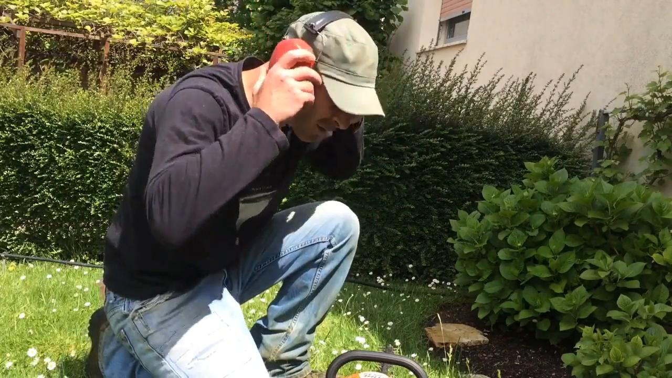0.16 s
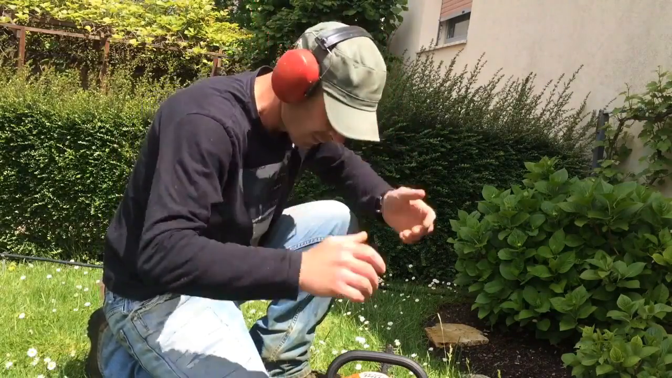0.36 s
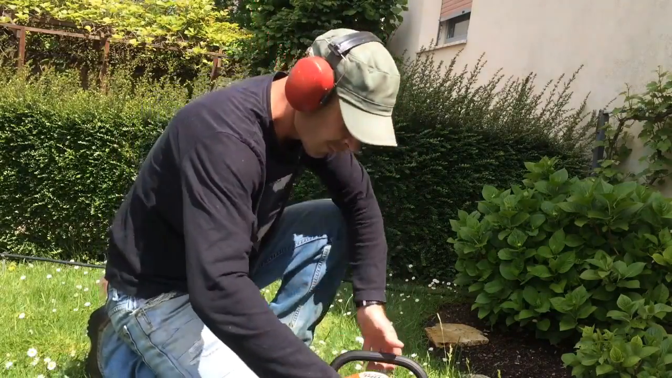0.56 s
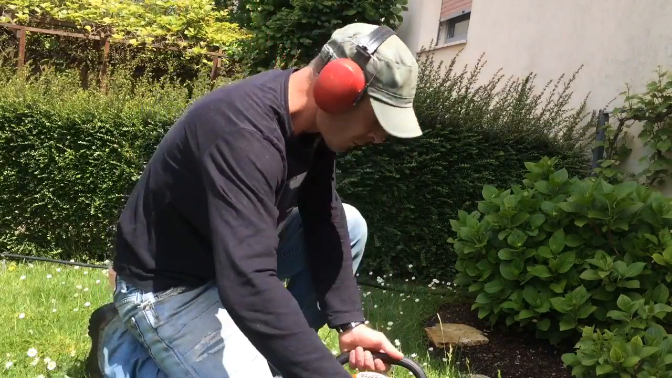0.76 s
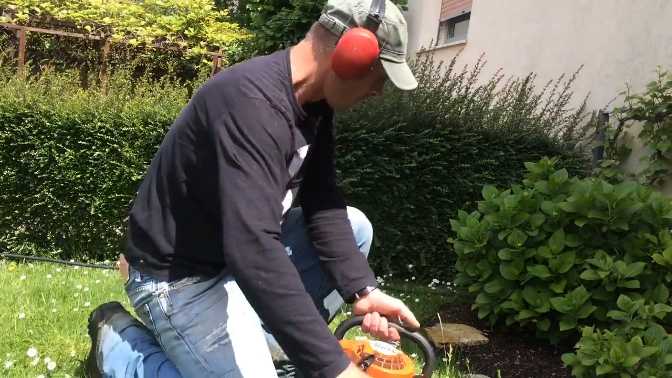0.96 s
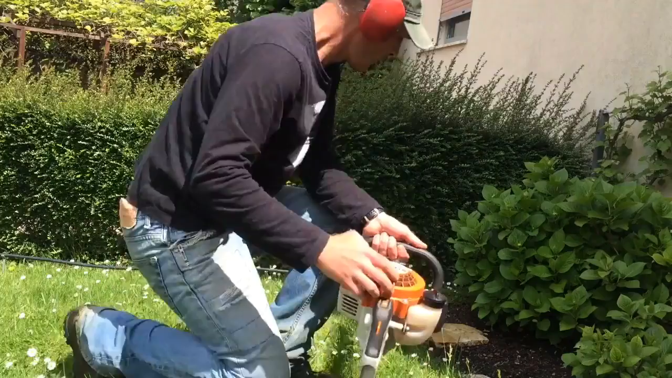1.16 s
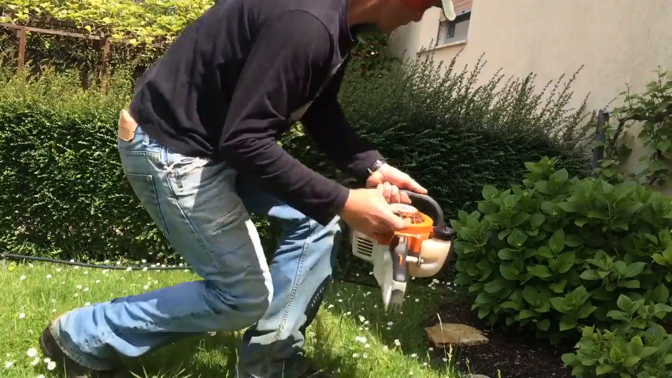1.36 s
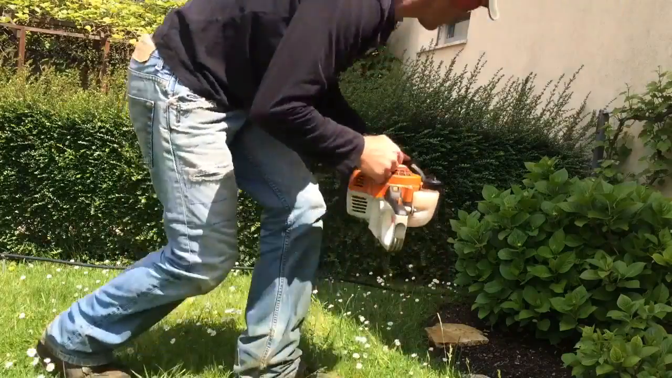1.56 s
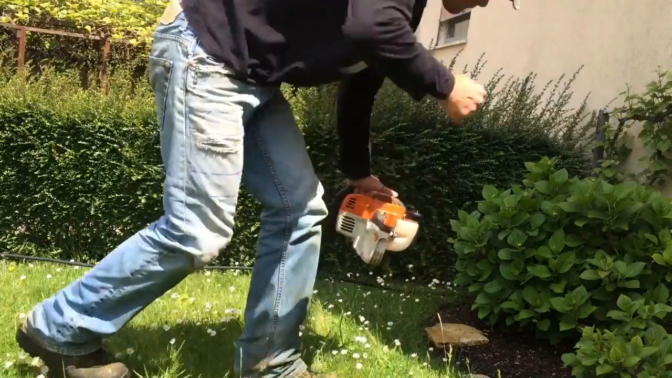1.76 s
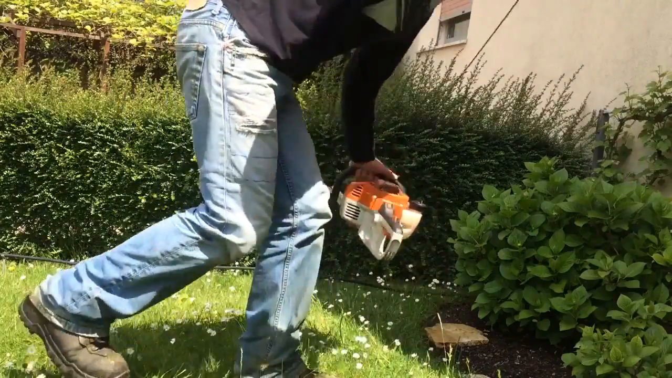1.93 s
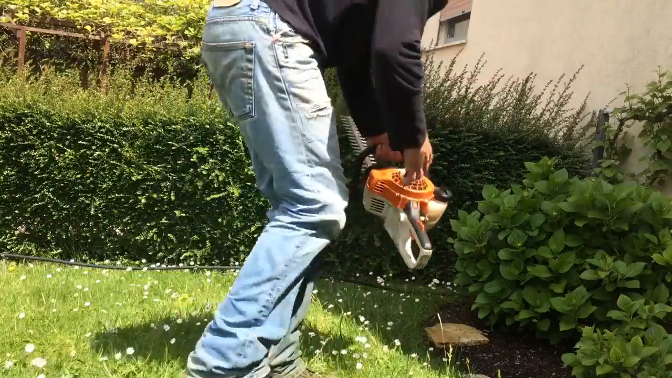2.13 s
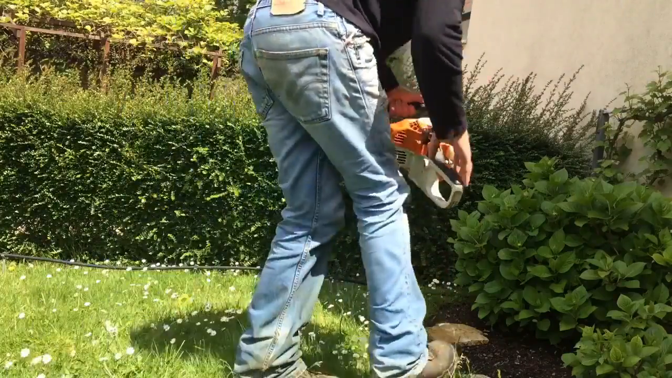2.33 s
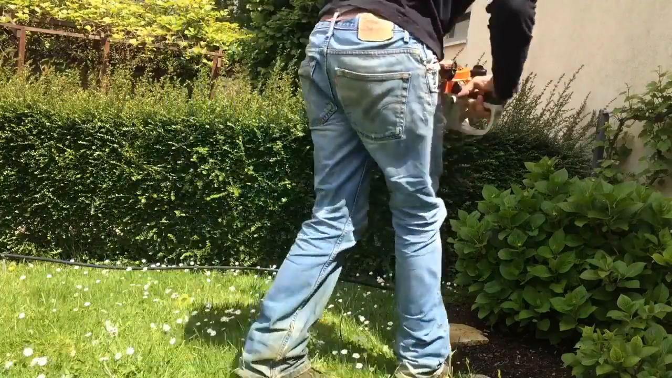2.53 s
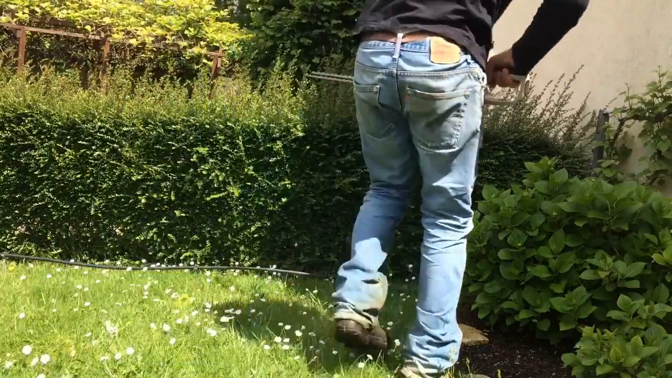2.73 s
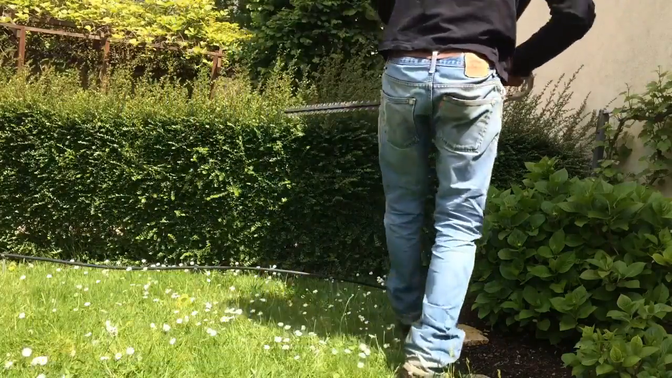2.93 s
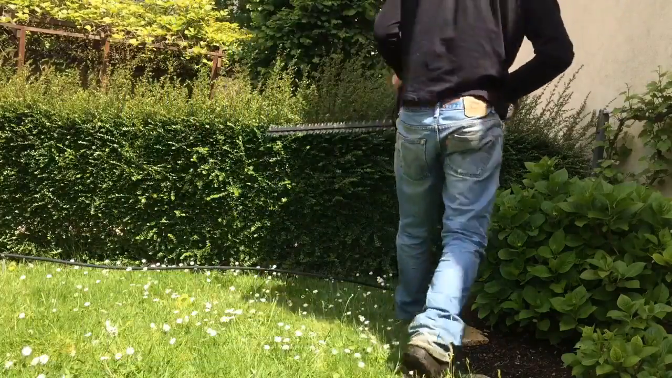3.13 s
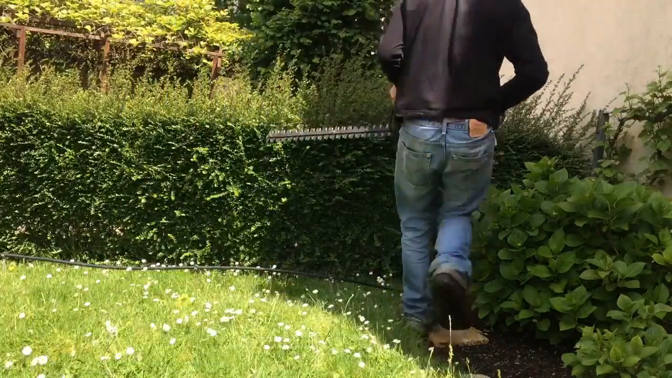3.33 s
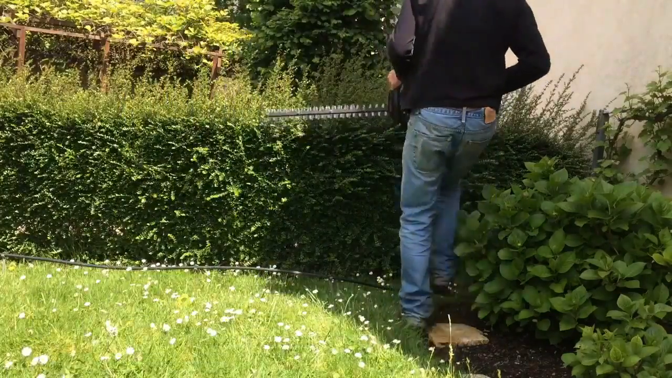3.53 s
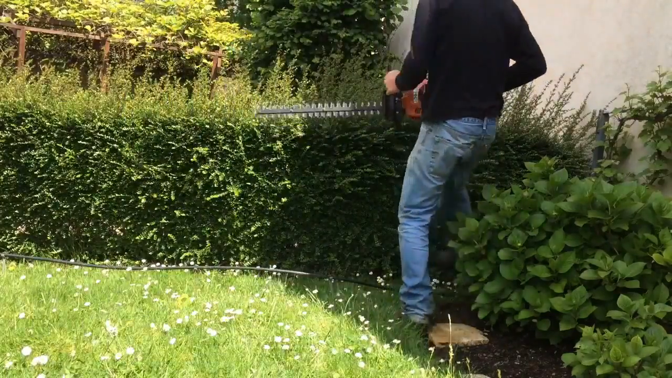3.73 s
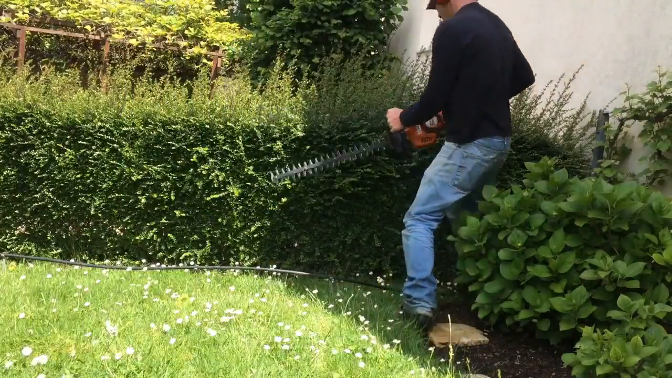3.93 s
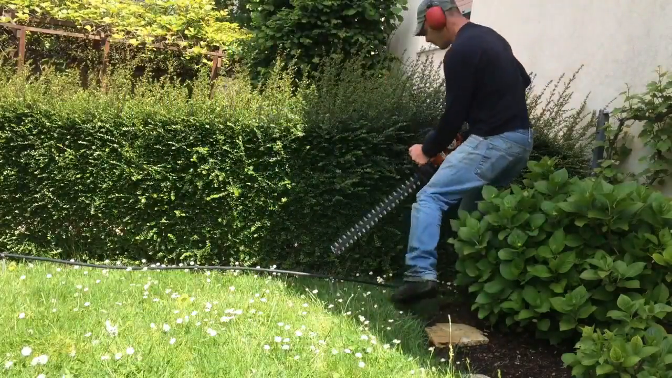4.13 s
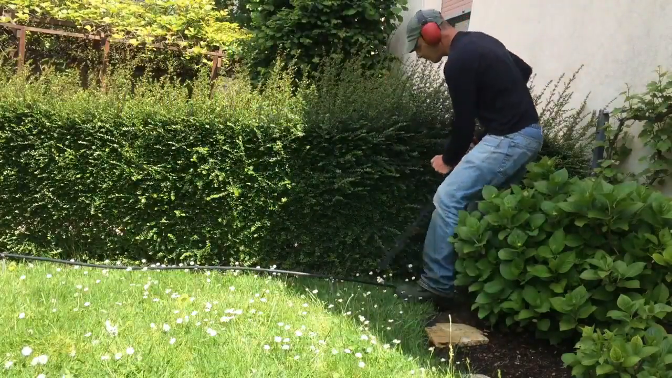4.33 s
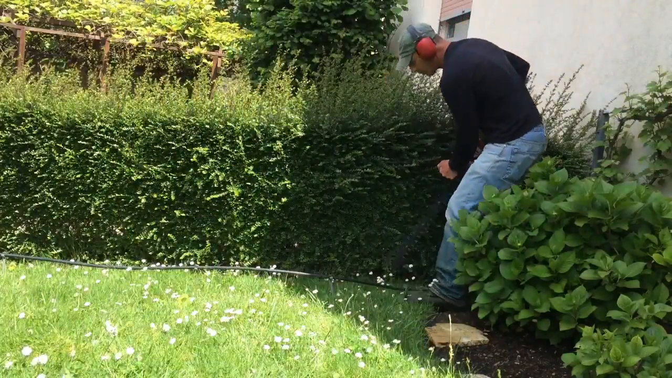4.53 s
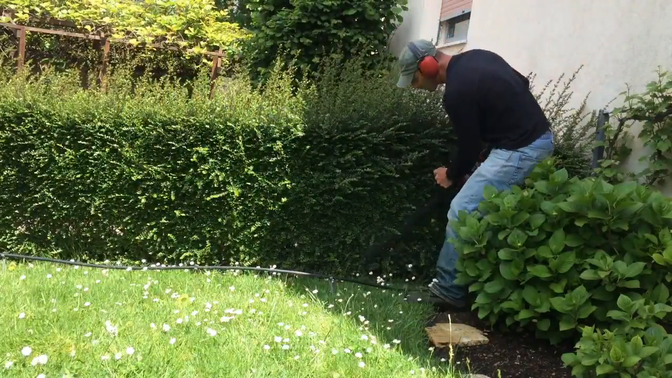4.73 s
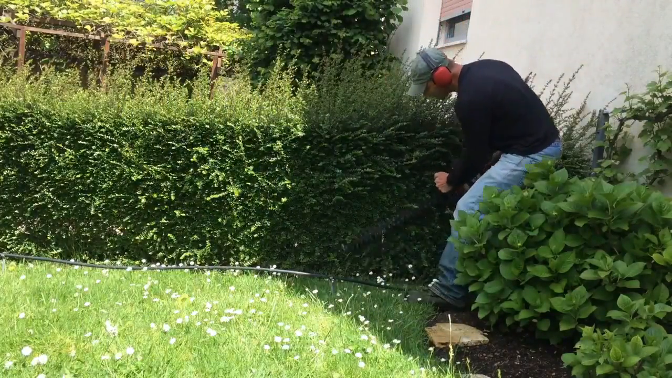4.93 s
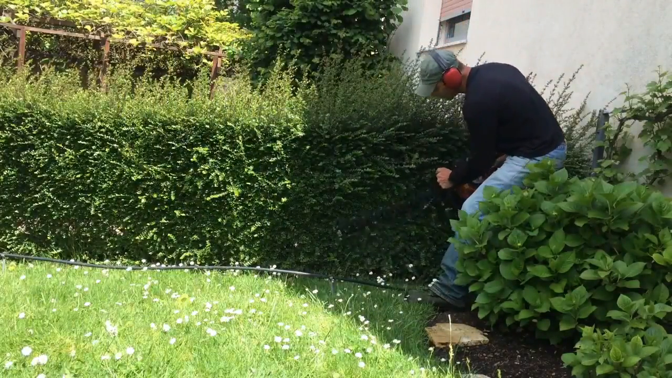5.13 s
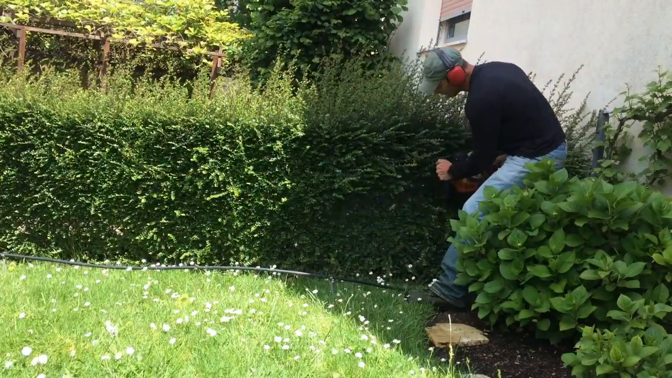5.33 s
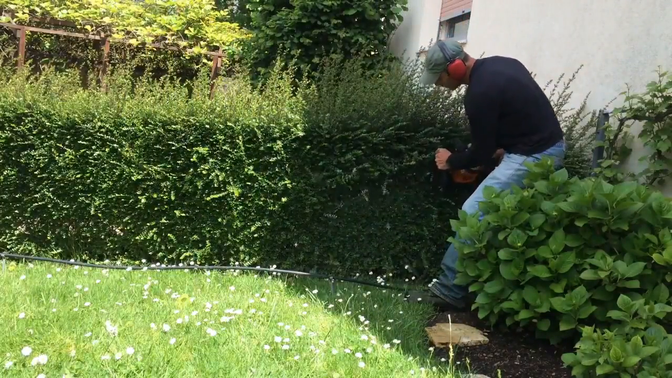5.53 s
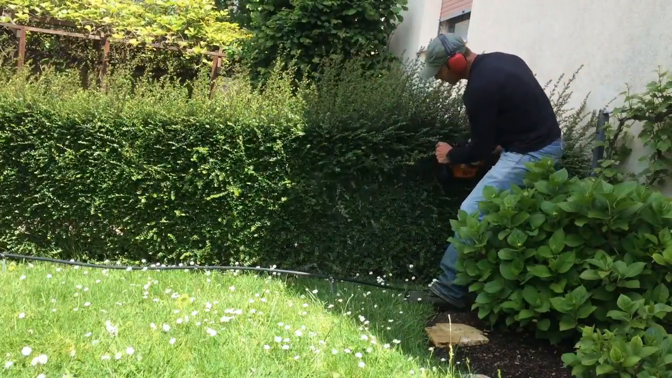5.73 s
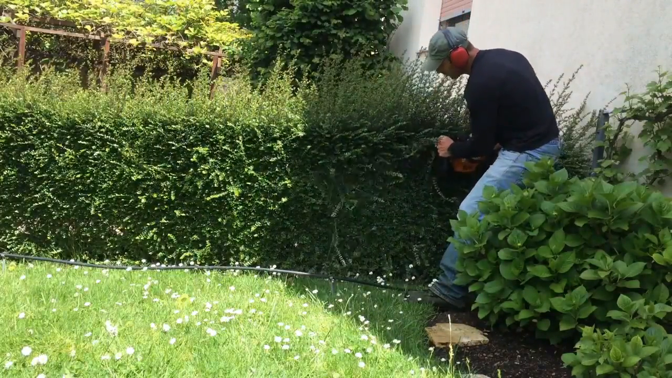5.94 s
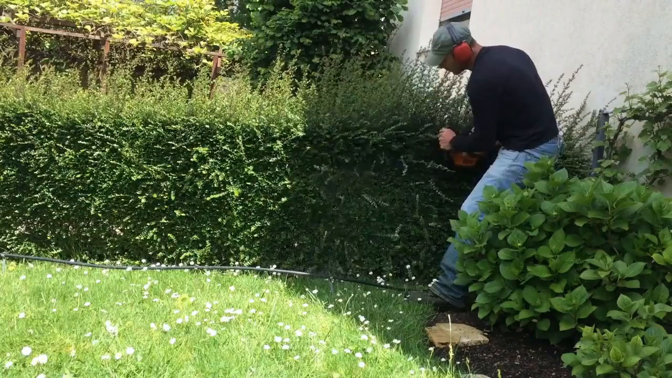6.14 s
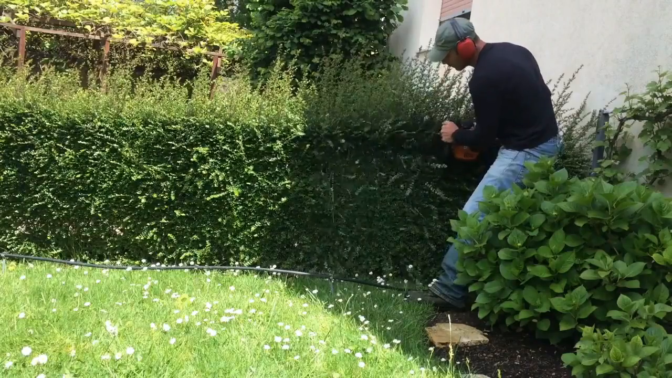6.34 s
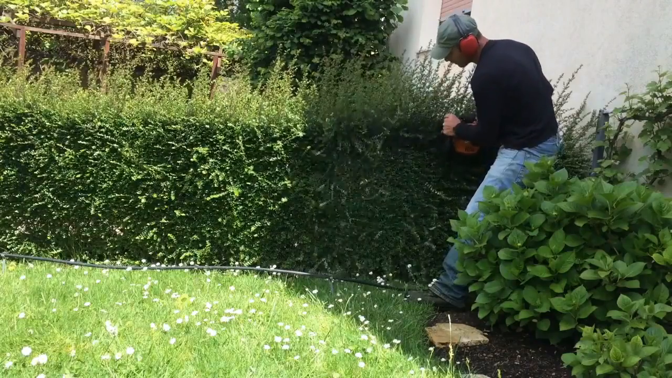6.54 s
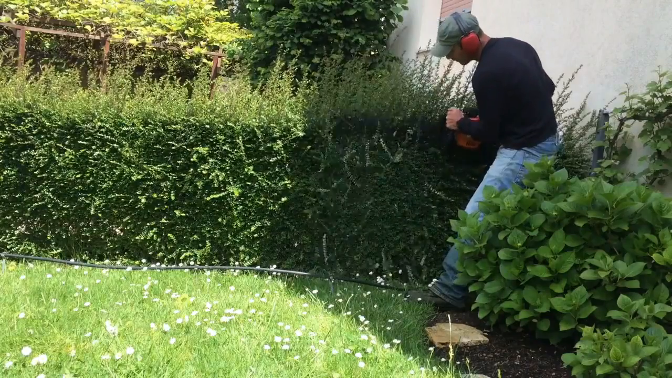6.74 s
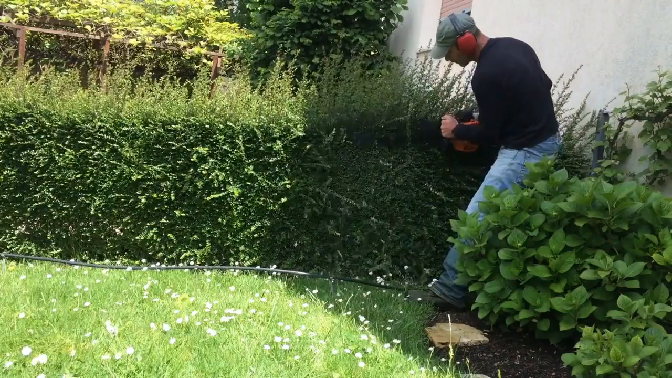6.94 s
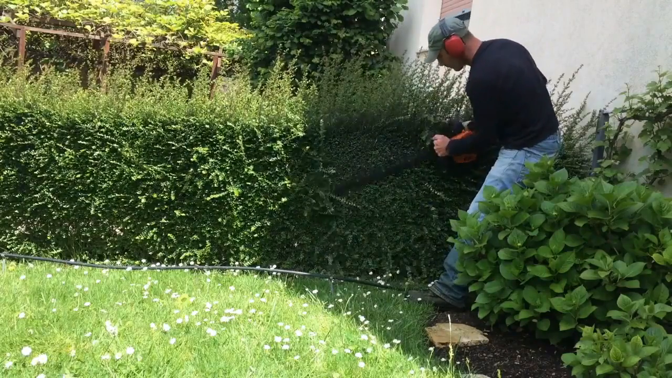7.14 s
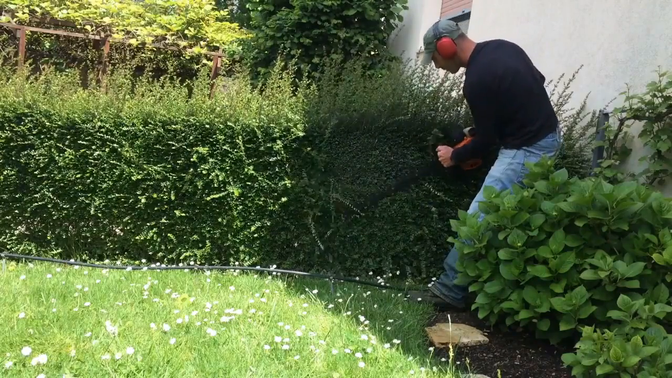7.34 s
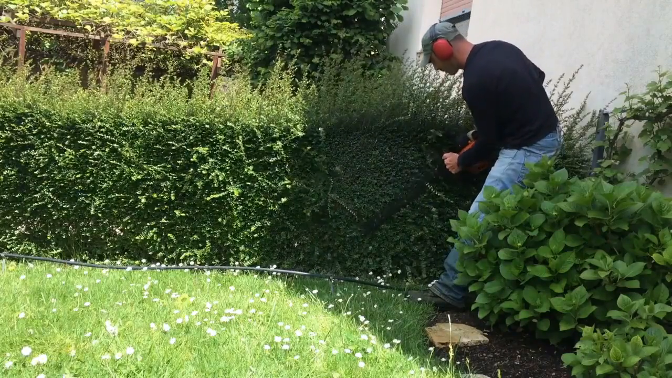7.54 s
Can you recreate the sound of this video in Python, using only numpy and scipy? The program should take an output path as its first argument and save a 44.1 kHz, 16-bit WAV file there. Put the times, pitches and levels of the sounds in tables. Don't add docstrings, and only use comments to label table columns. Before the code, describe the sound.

A dry outdoor garden, heard from one fixed microphone, almost mono. From 0 to 1.7 s it is quiet: low lumpy wind puffs, faint cloth rustle, small plastic clicks, a sharper knock at 0.9 and a stronger one at 1.3. At about 1.8-2.4 s hard, hollow plastic knocks cluster with short ratchety starter-cord rasps, the loudest clack near 2.35, while a small two-stroke engine coughs and catches from 1.9. Until 4.5 s it idles unevenly, roughly twelve dull pops a second, with puffing exhaust, rattling casing and metallic pings; the pops grow duller as it is carried away. From 4.5 s it revs up sharply, reaching top speed by about 5.1. A loud, nasal exhaust drone holds, fluttering rapidly with limiter thumps over bright fan and blade hiss and slight twig crackle. Around 7.1 s pitch and level sag briefly, then recover, running on to the abrupt end at 7.6.

```python
import sys
import numpy as np
from scipy import signal
from scipy.io import wavfile
from scipy.ndimage import uniform_filter1d

SR = 44100
rng = np.random.default_rng(int(sys.argv[2]) if len(sys.argv) > 2 else 0)


def store_wav(level_fs):
    pcm = np.round(np.clip(np.atleast_2d(level_fs), -1, 1) * 32767)
    wavfile.write(sys.argv[1], SR, pcm.T.astype(np.int16))


def convert_level_to_amplitude(level_db):
    exponent = np.asarray(level_db, float) / 20
    return 10 ** exponent


N = 334719
TIME = np.arange(N) / SR


def evened(x):
    return x / np.sqrt(np.mean(x ** 2) + 1e-20)


def read(points, hz):
    f, value = np.transpose(points)
    return np.interp(np.log(hz + 1), np.log(f + 1), value)


def columns(rows):
    s, *rest = np.transpose(rows)
    return [np.interp(TIME, s, c) for c in rest]


def drift(hz):
    return evened(signal.lfilter(*signal.butter(1, hz, fs=SR), rng.standard_normal(N)))


def spikes(s, db):
    out = np.zeros(N)
    out[np.round(np.asarray(s) * SR).astype(int)] = convert_level_to_amplitude(db)
    return out


def ringing(modes, rise_s):
    t = TIME[:4000]
    rings = sum(convert_level_to_amplitude(db) * np.exp(-np.pi * w * t) * np.sin(2 * np.pi * f * t) for f, w, db in modes)
    return (1 - np.exp(-t / rise_s)) * rings


def causal(points):
    hz = abs(np.fft.fftfreq(8192, 1 / SR))
    gain = np.log(convert_level_to_amplitude(np.maximum(read(points, hz), -100)))
    pulse = np.fft.ifft(np.exp(gain - 1j * signal.hilbert(gain).imag)).real[:2048]
    return pulse / abs(pulse).max()


def noise(points, rings=(), sweep=((0, 0),), ring_db=0, patchy_db=1.5):
    frames, hz = N // 256 + 5, np.fft.rfftfreq(1024, 1 / SR)[:, None]
    t = np.arange(frames) * 256 / SR
    a, b, patches = rng.standard_normal((frames, 513, 3)).T
    patches = uniform_filter1d(patches, size=8, axis=0)
    patches = evened(uniform_filter1d(patches, size=10, axis=1))
    slide = np.interp(t, *np.transpose(sweep))
    swung = np.interp(t, *np.transpose(LOAD)[::2])
    flicker = uniform_filter1d(rng.standard_normal((frames, 8)), size=9, axis=0)
    flicker_db = 2.2 * evened(flicker).T
    lift = 1
    for (f, w, db, *change), wobble_db in zip(rings, flicker_db):
        peak_db = ring_db + 0.61 * (db + sum(change) * swung) + wobble_db
        lift = lift + convert_level_to_amplitude(peak_db) / (1 + (2 * (hz - f - slide) / w) ** 2)
    z = (a + 1j * b) * convert_level_to_amplitude(patchy_db * patches + read(points, hz)) * lift
    return evened(signal.istft(z, nperseg=1024, noverlap=768)[1][:N])


# f/Hz, level/dB per Hz
WIND = [(12, -57), (20, -27), (38, -7.5), (92, 0.5), (269, -20), (420, -22), (500, -25), (650, -56),
        (1100, -120)]
# t/s, level/dB
GUSTS = [
    (.17, 8.5),
    (.45, 6),
    (.7, 8.5),
    (.914, 8),
    (1.2, 6),
    (1.47, 4.5),
    (1.7, 5),
]
# f/Hz, level/dB per Hz
RUSTLE = [(150, -5.5), (250, -12.5), (1700, -15.5), (2060, -17), (3010, -20.5), (14700, -27), (15500, -33)]
# t/s, level/dB
MOVING = [(0, -69.5), (.28, -73), (.334, -66.5), (.45, -70.5), (.63, -71.5), (.84, -65), (.92, -66),
          (1.05, -63), (1.17, -65), (1.29, -58), (1.49, -66), (1.72, -68.5)]


def air():
    gust_s = 0.08
    wind_db = -66 + sum(db * np.exp(-((TIME - s) / gust_s) ** 2 / 2) for s, db in GUSTS)
    wind = convert_level_to_amplitude(wind_db) * noise(WIND, patchy_db=0.3)
    return wind + convert_level_to_amplitude(columns(MOVING)[0]) * noise(RUSTLE, patchy_db=1.6)


# t/s, peak level/dB, ring f/Hz, treble level/dB
CLICKS = [(0.13, -49, 3140, 1), (0.3, -50, 2050, -14), (0.369, -59, 2000, -7), (0.691, -39, 2160, -56),
          (0.805, -31, 2300, -42), (0.825, -36, 2600, -34), (0.905, -19.5, 2670, 2),
          (1.001, -48, 1300, -30), (1.093, -45, 2500, -23), (1.041, -36, 2800, -24),
          (1.328, -13, 1390, -11), (1.338, -28, 1430, -35), (1.411, -37, 1630, -1), (1.452, -51, 1590, -18),
          (1.586, -42, 1000, 5), (1.742, -28.5, 1020, -40), (1.783, -22, 1080, -38),
          (1.803, -22.5, 1070, -25), (1.859, -4, 1480, -22), (1.962, -7, 1015, -14), (2.081, -22, 950, -13),
          (2.128, -13, 1110, -8), (2.157, -13, 1330, -4), (2.247, -31, 1230, -12), (2.347, 0, 2640, -6),
          (2.3495, -2, 1510, -19), (2.356, 0, 4050, -6)]
# f/Hz, level/dB per Hz
KNOCK = [(180, -38), (300, -31), (641, -7), (1350, 0), (2140, -5), (2830, -10.5), (3810, -16), (5210, -15),
         (15500, -41)]
# multiple of f, level/dB
OVERTONES = [(1, -1), (2.1, -5), (2.95, -11)]


def clicks():
    out, t = np.zeros(N + 4000), TIME[:4000]
    for s, db, hz, treble_db in CLICKS:
        t60 = 0.075 * 1000 / hz
        colour = causal([(f * (hz / 1350) ** 0.65, level) for f, level in KNOCK])
        fall = convert_level_to_amplitude(-60 * t / t60) + 2.5 * np.exp(-t / 0.001) + convert_level_to_amplitude(-20 - 60 * t / 0.3)
        crack = signal.oaconvolve(rng.standard_normal(len(t)) * fall, colour)[:len(t)]
        crack = crack + convert_level_to_amplitude(treble_db + 31.5) * np.gradient(crack)
        ring = sum(convert_level_to_amplitude(level - 90 * np.sqrt(k) * t / t60) * np.sin(2 * np.pi * k * hz * t)
                   for k, level in OVERTONES)
        hollow_db = -32 - 0.82 * treble_db * (hz / 2200) ** 2
        hollow = ringing([(640, 230, hollow_db)], rise_s=0.0014)
        knock = crack / abs(crack).max() + 0.48 * ring + hollow
        out[round(s * SR):][:len(t)] += convert_level_to_amplitude(db - 7.5) * knock
    return out[:N]


# t/s, level/dB, decay/s
STARTER = [
    (1.745, -64, 0.068),
    (1.79, -55, 0.026),
    (1.856, -32.5, 0.025),
    (1.966, -28, 0.066),
    (2.246, -46, 0.062),
    (2.344, -31.5, 0.037),
]


def starter():
    rise_s = 0.0038 / 3
    return sum(convert_level_to_amplitude(db) * np.exp(-abs(TIME - t) / np.where(TIME < t, rise_s, dies)) for t, db, dies in STARTER)


# t/s, pop peak level/dB, casing jolt/dB
CATCHING = [(1.908, -17.5, -5), (1.94, -13.5, 0), (1.963, -46, 2.5), (2.021, -26, 5), (2.087, -26, 1),
            (2.134, -35, 4.5), (2.176, -17, 2.5), (2.246, -34, 6), (2.31, -20, 2), (2.353, -41, -6.5),
            (2.401, -16.5, -2.5), (2.444, -43, 0.5), (2.493, -41, 2.5), (2.563, -43, 4.5), (2.636, -46, 4)]
# t/s, pop peak level/dB, casing jolt/dB
IDLING = [(2.724, -15, 6.1), (2.808, -17, 6.1), (2.871, -15, 2.4), (2.956, -18, 5.9), (3.038, -13, 4.1),
          (3.12, -12.5, 2.4), (3.202, -13, 3.2), (3.284, -9.5, 2.2), (3.324, -18, 2.7), (3.365, -14, 4.4),
          (3.443, -9.5, 2.4), (3.505, -12, 7), (3.588, -21, 8.4), (3.67, -15, 6.4), (3.754, -26, 4.4),
          (3.836, -30, 5.5), (3.919, -23, 5), (3.999, -30, 5.6), (4.039, -45, 4.9), (4.12, -23, 3.3),
          (4.192, -29, 4.1), (4.251, -29, 3.4), (4.312, -26, 5.9), (4.38, -40, 7.1), (4.4, -16, 4.3),
          (4.46, -28, 3), (4.483, -22, 6.8)]
ALL_FIRINGS = CATCHING + IDLING
# t/s, shaft speed/turns per s
RUN = [(4.5, 58.5), (4.57, 84.5), (4.66, 113), (4.75, 134.6), (4.79, 145.6), (4.86, 152.3), (5.03, 161.2),
       (5.11, 167.6), (5.36, 168.6), (5.7, 168), (6.95, 169), (7.02, 166.9), (7.13, 149.8), (7.24, 156.5),
       (7.31, 164.2), (7.4, 168.8), (7.59, 170)]


def shaft():
    idle_turns_per_s = 45
    s = np.transpose(ALL_FIRINGS)[0]
    whole = np.r_[0, np.cumsum(np.round(np.diff(s) * idle_turns_per_s))]
    running = columns(RUN)[0] * (1 + .001 * drift(20)) * (TIME > s[-1])
    return np.interp(TIME, s, whole) + np.cumsum(running) / SR


def jolts():
    s, _, jolt_db = np.transpose(ALL_FIRINGS)
    last = np.maximum(np.searchsorted(s, TIME) - 1, 0)
    return uniform_filter1d(jolt_db[last] * np.exp(-abs(TIME - s[last]) / 0.081), size=100)


# t/s, casing level/dB, pipe level/dB
CARRIED = [(1.84, -44, -18), (1.9, -33.5, -22), (1.97, -34, -26), (2.2, -36, -30), (2.4, -32.5, -28.5),
           (2.62, -38.5, -27), (2.8, -35, -26.5), (3.4, -36.5, -27.5), (3.57, -41, -28.5), (3.75, -37, -29),
           (4.06, -37, -37), (4.24, -38.5, -32), (4.36, -44.5, -29), (4.5, -35.5, -35)]


def casing():
    jolt_db, rasp = jolts(), starter()
    caught = convert_level_to_amplitude(columns(CARRIED)[0]) * (TIME > CARRIED[0][0])
    idle_body = caught * convert_level_to_amplitude(jolt_db) + rasp
    idle_fizz = (caught * convert_level_to_amplitude(1.27 * jolt_db) + rasp) * convert_level_to_amplitude(0.2)
    throttle = np.clip((TIME - RUN[0][0] + 0.011) / 0.052, 0, 1)
    load_db, swung = columns(LOAD)
    full_body = convert_level_to_amplitude(-21.5 + 0.17 * load_db)
    full_fizz = convert_level_to_amplitude(-28 + 0.098 * load_db - 2.5 * swung)
    body = (1 - throttle) * idle_body + throttle * full_body
    fizz = (1 - throttle) * idle_fizz + throttle * full_fizz
    return body, fizz


def clanks():
    strikes_per_s = 160
    size = convert_level_to_amplitude(3.5 * np.minimum(rng.exponential(1, N), 3)) * (rng.random(N) < strikes_per_s / SR)
    part = rng.integers(0, 12, N)
    out = np.zeros(N)
    for k, hz in enumerate(np.geomspace(1400, 8600, 12)):
        ring = ringing([(hz, 120 + .07 * hz, 0), (1.7 * hz, 700, -3)], rise_s=0.0006)[:1000]
        out += signal.oaconvolve(size * (part == k), ring)[:N]
    return evened(out)


# f/Hz, level/dB per Hz
ROAR_IDLE = [(180, -3), (300, -4), (663, -2), (953, 1.5), (1140, -0.5), (2480, -0.5), (3450, -4.5),
             (4210, -2), (6360, -6), (7020, -7.5), (7500, -8), (9600, -10), (15500, -14)]
# f/Hz, width/Hz, level/dB
RING_IDLE = [(3175, 43, 12), (4110, 200, 5), (4360, 93, -7), (5220, 36, 16), (6970, 140, 14.5),
             (7900, 390, -11), (9400, 770, -5), (10570, 72, 6)]


def rattle(turns, gate, struck):
    each_turn_db = 2.2 * rng.standard_normal(int(turns[-1]) + 1)
    harder = uniform_filter1d(convert_level_to_amplitude(each_turn_db[turns.astype(int)]), size=60)
    shaken = noise(ROAR_IDLE, RING_IDLE, ring_db=-5.0, patchy_db=2.5)
    return shaken * evened((1.1 + gate) * harder) + 0.28 * struck


def roar(turns, cuts):
    body, fizz = casing()
    throttle = np.clip((TIME - RUN[0][0]) / 0.063, 0, 1)
    gate = np.exp(-((turns + 0.25 * drift(11)) % 1) / 0.39)
    struck = clanks()
    both = np.sqrt(1 - throttle) * rattle(turns, gate, struck) + np.sqrt(throttle) * hiss(cuts, gate, struck)
    low = signal.sosfiltfilt(signal.butter(2, 4500, fs=SR, output="sos"), both)
    return body * evened(low) + fizz * evened(both - low)


# f/Hz, level/dB per Hz
POP = [(40, -14), (90, -10), (200, -13), (500, -11.5), (900, -8.5), (1500, -21), (3000, -23), (8000, -38)]
# f/Hz, width/Hz, level/dB
PUFF_NEAR = [(84.5, 89, -34), (151, 28.5, -2.5), (254.5, 45, 5), (346, 43, -9)]
# f/Hz, width/Hz, level/dB
PUFF_FAR = [(92, 31, -19), (155, 54, -8.5), (201.3, 41, 4.5), (350, 54, -4.5)]
# t/s, share 0-1
TURNED = [(2.5, 0.58), (3.0, 0.74), (4.0, 1), (4.3, 0.73)]


def idle(turns):
    s, pop_db, _ = np.transpose(ALL_FIRINGS)
    stumble = np.maximum.accumulate(turns + .035 * drift(15))
    ports = (np.diff(np.floor(stumble), prepend=-1) > 0) * (TIME < s[-1])
    ports[0] = 0
    ports[round(s[0] * SR)] = 1
    uneven_db = 1.8 * rng.standard_normal(N)
    push = ports * convert_level_to_amplitude(columns(CARRIED)[1] + uneven_db + 0.25 * jolts() + 3.0)
    turned = np.clip(columns(TURNED)[0], 0, 1)
    near = signal.oaconvolve(push * (1 - turned), ringing(PUFF_NEAR, rise_s=0.001))[:N]
    far = signal.oaconvolve(push * turned, ringing(PUFF_FAR, rise_s=0.0037))[:N]
    fired = signal.oaconvolve(spikes(s, pop_db - 16.5), ringing(PUFF_FAR, rise_s=0.0046))[:N]
    pops = spikes(s + 0.00201, pop_db - 3.0)
    pops = pops + 0.55 * np.roll(pops, round(0.00725 * SR))
    pops = pops + 0.5 * np.roll(pops, round(0.00325 * SR))
    return near + far + fired - signal.oaconvolve(pops, causal(POP))[:N]


# t/s, peak level/dB, ring f/Hz
PINGS = [(2.4021, -21, 1150), (2.439, -24, 1040), (2.5642, -20, 2330), (2.6383, -13, 2250),
         (2.67, -13, 6980), (2.7224, -13.5, 4330), (2.8047, -23, 3240), (2.9538, -18, 2200),
         (3.0361, -11, 5300), (3.1577, -16, 5070), (3.1768, -14, 4400), (3.205, -24, 4380),
         (3.238, -14.5, 4340), (3.4808, -18.5, 990), (3.5107, -11, 5380), (3.5897, -27, 6000),
         (3.6698, -18, 990), (3.7255, -18, 1720), (3.7515, -15, 1990), (3.808, -13.5, 1760),
         (3.8355, -20, 3992), (3.9185, -9.5, 1030), (3.9717, -11, 1860), (3.999, -14, 1560),
         (4.034, -13, 3080), (4.1023, -10.5, 970), (4.1822, -12.5, 2380), (4.248, -14, 3030),
         (4.3105, -16, 1030), (4.3816, -16, 1210), (4.4588, -15.5, 3280), (4.4847, -15, 1270)]


def pings():
    out, t = np.zeros(N), TIME[:4000]
    colour = causal(ROAR_IDLE)
    for s, db, hz in PINGS:
        burst = signal.oaconvolve(rng.standard_normal(len(t)) * np.exp(-t / 0.015), colour)[:len(t)]
        ring = ringing([(hz, 130, db - 3), (1.16 * hz, 200, db - 14)], rise_s=0.002)
        out[round(s * SR):][:4000] += ring + convert_level_to_amplitude(db - 7.5) * burst / abs(burst).max()
    return out


# t/s, peak level/dB
CLIMBING_CUTS = [(4.859, -29), (4.885, -22), (4.962, -25), (5.061, -24), (5.106, -25), (5.134, -24)]
# t/s, peak level/dB
CUTS = [(5.161, -29), (5.196, -27), (5.234, -27), (5.272, -25), (5.302, -38), (5.339, -32), (5.383, -28),
        (5.42, -35), (5.454, -34), (5.495, -30), (5.531, -29), (5.565, -37), (5.603, -35), (5.638, -32),
        (5.672, -36), (5.71, -39), (5.744, -29), (5.777, -28), (5.814, -36), (5.85, -37), (5.888, -29),
        (5.922, -33), (5.952, -32), (5.982, -32), (6.017, -29), (6.054, -34), (6.09, -33), (6.118, -31),
        (6.155, -32), (6.189, -35), (6.232, -30), (6.264, -33), (6.304, -33), (6.343, -32), (6.38, -31),
        (6.415, -32), (6.451, -39), (6.486, -37), (6.528, -30), (6.568, -36), (6.602, -36), (6.637, -37),
        (6.678, -31), (6.718, -37), (6.751, -36), (6.797, -28), (6.834, -32), (6.883, -42), (6.928, -35),
        (6.973, -45), (7.005, -42), (7.056, -39),
        (7.122, -40), (7.155, -35), (7.202, -31), (7.232, -33), (7.306, -39), (7.353, -35),
             (7.384, -32), (7.42, -38), (7.463, -25), (7.499, -34), (7.538, -32), (7.578, -35)]
ALL_CUTS = CLIMBING_CUTS + CUTS


def limiter():
    first_cuts_per_s, cuts_per_s, top_turns_per_s = 40, 27.5, 166
    s = np.r_[np.transpose(ALL_CUTS)[0], TIME[-1]]
    climbing = np.interp(s[1:], TIME, columns(RUN)[0]) < top_turns_per_s
    whole = np.round(np.diff(s) * np.where(climbing, first_cuts_per_s, cuts_per_s))
    return 2 * np.pi * np.interp(TIME, s, np.r_[0, np.cumsum(whole)])


def cut_thumps(cuts, load_db):
    cut_s, cut_db = np.transpose(ALL_CUTS)
    starts = np.diff(np.floor(cuts / (2 * np.pi)), prepend=0) > 0
    every_cut = convert_level_to_amplitude(-47 + 0.8 * load_db + 3.5 * drift(30)) * starts
    boom = ringing([(88, 32.0, 6.1), (260, 100, 13.7)], rise_s=0.0042)
    thumps = signal.oaconvolve(spikes(cut_s - .005, cut_db - 1.5) + every_cut, boom)[:N]
    return signal.sosfilt(signal.butter(3, 400, fs=SR, output="sos"), thumps)


# t/s, gas pressure level/dB, pipe swung away 0-1
LOAD = [(4.5, -11.5, 0.3), (4.6, -4.5, 0.46), (4.75, -0.5, 0), (4.9, 1, 0.07), (5.2, -1, 0), (5.75, -2, 1),
        (6.3, -2, 1), (7.0, -4, 1), (7.1, -13, 0.4), (7.25, -1, 0.96), (7.42, -2, 0.58), (7.59, -1, 0.7)]
# f/Hz, level/dB; the first cancels at two speeds
ORDER_1 = [(58, -25), (85, -18), (125, -23.5), (146, -40), (151, -28.5), (158, -29), (162, -44),
           (166, -28.5)]
ORDER_2 = [(117, -40), (170, -32), (200, -29), (250, -37), (300, -32), (325, -26.5), (340, -25.5)]
ORDER_5 = [(290, -26), (450, -51), (565, -30), (670, -48), (730, -32.5), (800, -24.5), (845, -27)]
ORDER_6 = [(350, -62), (500, -37), (800, -54), (900, -36), (950, -41.5), (1010, -46.5)]
# f/Hz, level/dB
PIPE = [(120, -26), (250, -25), (400, -36.5), (505, -45.5), (675, -37.5), (900, -52), (1180, -36),
        (1350, -47), (1520, -43), (1690, -42.5), (1850, -40), (2100, -61), (2360, -38.5), (2520, -53)]
# f/Hz, width/Hz, level/dB
CAN = (950, 83, 17)
# f/Hz, level/dB
RASP = [(2500, -54), (2700, -37), (2870, -45), (3030, -47), (3700, -54), (4200, -49), (4900, -52),
        (5600, -44)]


def exhaust(turns, cuts):
    speed, (load_db, swung) = columns(RUN)[0], columns(LOAD)
    can_hz, can_width_hz, can_db = CAN
    climb_db = 1.5 * np.clip((150 - speed) / 20, 0, 1)
    level_db = {}
    for k in range(1, 16):
        can_lift_db = can_db / (1 + (2 * (k * speed - can_hz) / can_width_hz) ** 2)
        level_db[k] = read(PIPE, k * speed) + load_db + climb_db + can_lift_db
    swung_db = (-3, -2.5, -2.5, 16)
    for k, points, db in zip((1, 2, 5, 6), (ORDER_1, ORDER_2, ORDER_5, ORDER_6), swung_db):
        level_db[k] = read(points, k * speed) + 0.69 * load_db + db * swung
    flutter_db = [3.0 * drift(10) for _ in range(6)]
    for k in range(15, 34):
        level_db[k] = read(RASP, k * speed) + load_db + flutter_db[k % 6]

    limited = np.clip((speed - 146) / 10, 0, 1)
    phase = 2 * np.pi * turns + 0.01 * limited * np.sin(cuts + 0.15)
    waver_db = [.7 * drift(8) for _ in range(4)]
    tone = {k: convert_level_to_amplitude(db + waver_db[k % 4]) * -np.cos(k * phase + 2.0 * rng.random())
            for k, db in level_db.items()}
    dips = 1.25 * (1 - 0.72 * limited * np.exp(1.9 * (np.cos(cuts - .15) - 1)))
    lope = (1 - limited) * convert_level_to_amplitude(level_db[1] - 18 + 6.1 * drift(12)) * np.sin(phase / 2)
    first = lope + tone.pop(1) * (1 + 0.021 * limited * np.cos(cuts - 3.5))
    opening = np.clip((TIME - RUN[0][0] + 0.044) / 0.044, 0, 1)
    return convert_level_to_amplitude(1.5) * opening * (first + dips * sum(tone.values())) + cut_thumps(cuts, load_db)


# f/Hz, level/dB per Hz
ROAR_FULL = [(40, -42), (90, -20), (230, -23.5), (330, -11), (450, -17.5), (630, -14.5), (800, -5),
             (1100, -12), (1800, -9), (2570, -18), (3220, -13), (4800, -11), (6000, -11.5), (11000, -9.5),
             (15500, -12.5)]
# f/Hz, width/Hz, level/dB, change when swung/dB
RING_FULL = [(2500, 320, 20.5, 4.5), (2960, 65, 13, 1), (3830, 81, 0, 17), (4800, 400, 7, -0.5),
             (5380, 79, 15.5, 2), (6100, 50, 6, -8), (7830, 63, -4, -2), (10650, 200, 4.5, -6)]
# t/s, shift f/Hz
SWEEP = [(4.6, 83), (5.0, 22), (5.6, -69), (6.2, 82), (7.0, 27), (7.4, -110), (7.59, -8)]


def hiss(cuts, gate, struck):
    pulsing = (1 + 0.17 * np.cos(cuts - 1.55)) * (1 + 0.3 * gate)
    blades = noise(ROAR_FULL, RING_FULL, SWEEP, ring_db=-7.0, patchy_db=1.17)
    return blades * convert_level_to_amplitude(0.28 * drift(33)) * evened(pulsing) + 0.09 * struck


# t/s, first notch f/Hz, strength 0-1
LAWN = [(1.9, 600, 0.4), (2.15, 606, 0.62), (2.45, 528, 0.62), (2.6, 440, 0.27), (2.72, 414, 0),
        (3.45, 523, 0), (4.15, 597, 0.17), (4.8, 573, 0.17), (5.4, 600, 0), (6.8, 595, 0.69),
        (7.59, 576, 0.26)]


def lawn(x):
    notch_hz, strength = columns(LAWN)
    dull = signal.sosfiltfilt(signal.butter(1, 2200, fs=SR, output="sos"), x)
    return x + np.clip(strength, 0, 1) * np.interp(TIME - .5 / notch_hz, TIME, dull)


def scene():
    turns, cuts = shaft(), limiter()
    machine = idle(turns) + roar(turns, cuts) + pings() + clicks()
    mono = lawn(machine) + exhaust(turns, cuts) + air()
    return np.array([mono, mono])


# t/s, low f/Hz, high f/Hz, level/dB
SLIPS = [(4.551, 4600, 5900, -38), (4.667, 8900, 10600, -38), (4.923, 11700, 15300, -37),
         (5.178, 4600, 7000, -31.5), (5.48, 11000, 14000, -40), (5.944, 4200, 5300, -37),
         (5.944, 10300, 11900, -39), (6.293, 4600, 5900, -38), (6.293, 6900, 8400, -38)]


def slips():
    out, window = np.zeros(N), np.hanning(2048)
    for s, lo_hz, hi_hz, db in SLIPS:
        band_pass = signal.butter(6, (lo_hz, hi_hz), "band", fs=SR, output="sos")
        band = signal.sosfiltfilt(band_pass, rng.standard_normal(2048))
        out[round(s * SR) - 1024:][:2048] += convert_level_to_amplitude(db - 3.5) * evened(band * window)
    return out


def roll_off(x):
    return signal.sosfilt(signal.butter(12, 15600, fs=SR, output="sos"), x)


def record(dry):
    dry = signal.sosfilt(signal.butter(3, 48, "high", fs=SR, output="sos"), dry)
    top_cut = signal.firwin(1023, 15480, window=("kaiser", 9), fs=SR)
    dry = signal.oaconvolve(dry, top_cut[None], "same")
    mix = dry + np.outer([1, -1], slips())
    return roll_off(mix)


dry = scene()
out = record(dry)
store_wav(out)
```